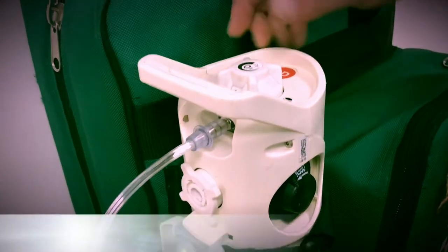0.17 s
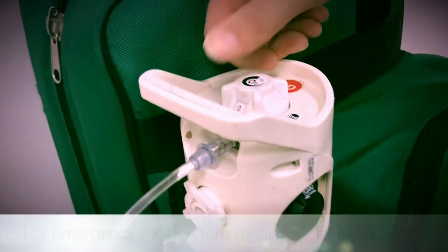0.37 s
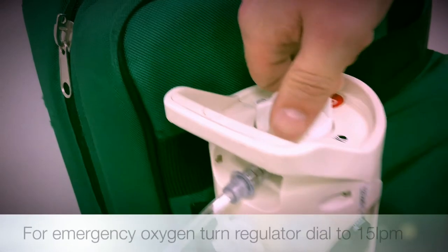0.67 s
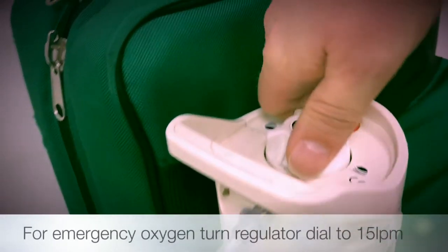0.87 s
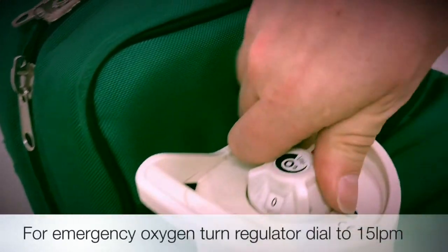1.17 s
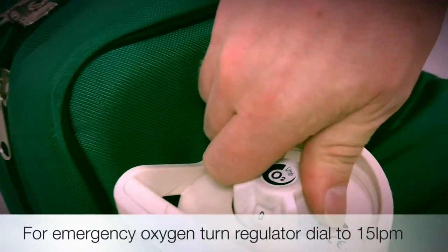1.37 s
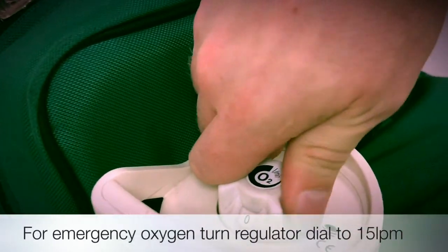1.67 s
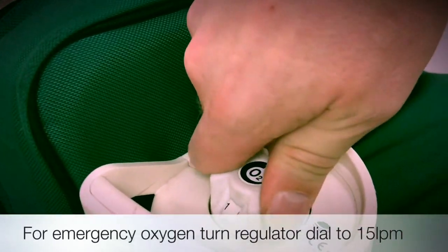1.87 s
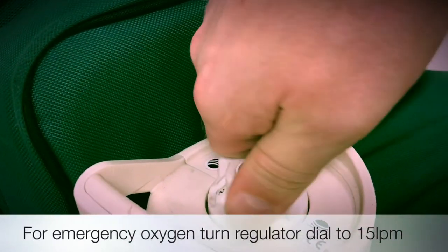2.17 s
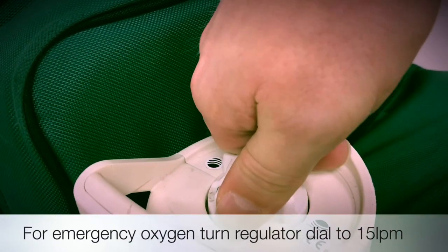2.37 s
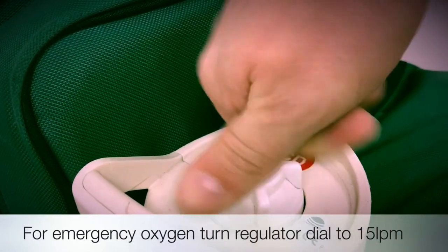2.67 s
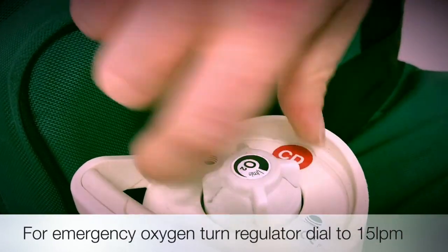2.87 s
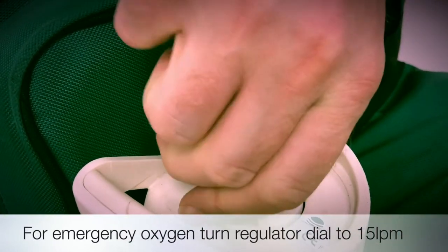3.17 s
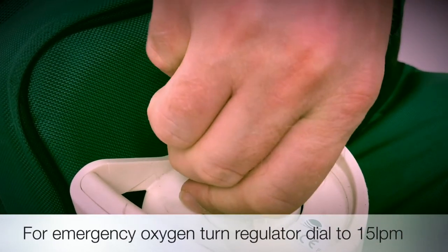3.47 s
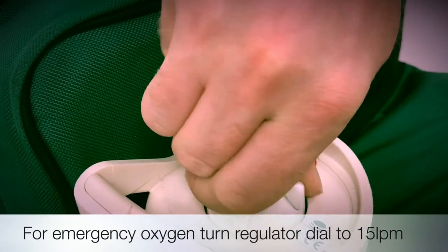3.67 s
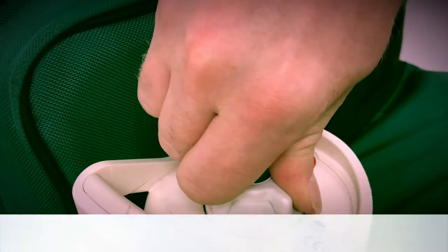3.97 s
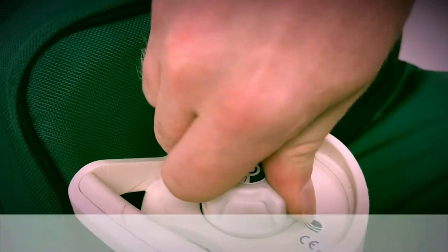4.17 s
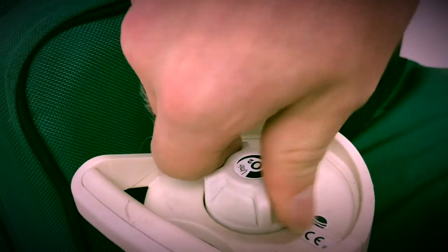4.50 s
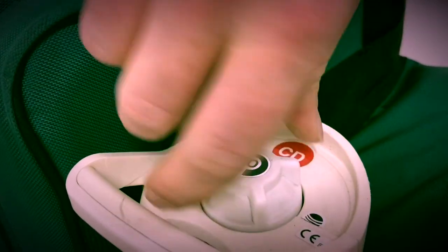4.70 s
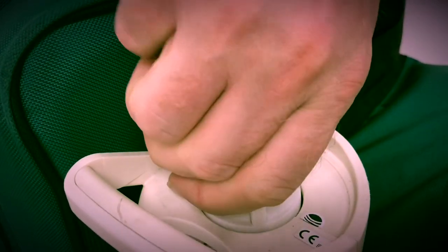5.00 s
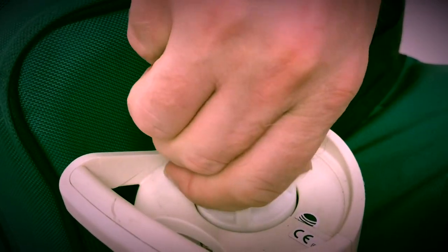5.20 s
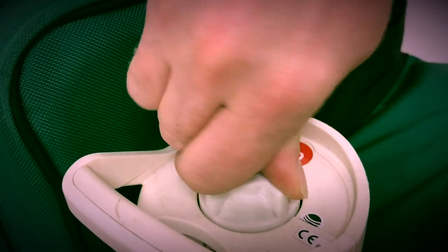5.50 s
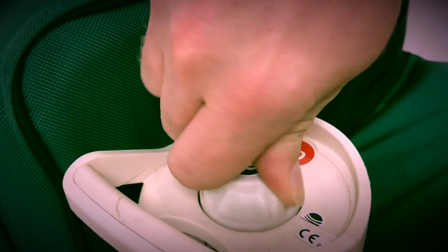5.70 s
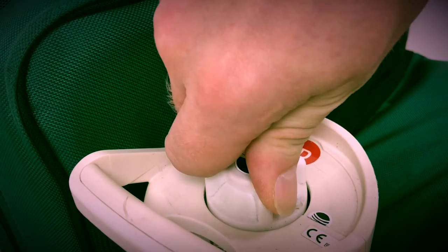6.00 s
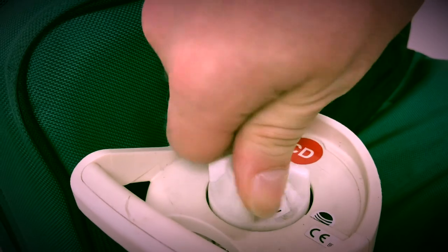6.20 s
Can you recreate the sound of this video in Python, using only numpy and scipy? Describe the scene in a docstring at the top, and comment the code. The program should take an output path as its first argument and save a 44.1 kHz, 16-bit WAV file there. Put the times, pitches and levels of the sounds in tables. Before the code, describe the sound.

A hand turns a plastic gas cylinder dial in a small humming room, ten sharp ratcheting clicks, with faint gas hiss growing stronger toward the end.

```python
"""A small room hums with ventilation and mains; a faint, steady microphone hiss and a thin whistle lie over it.
Fingers rub and tap the plastic flow dial of an oxygen cylinder, close to the microphone, taking a new grip.
Then a hand turns the dial: at each detent a spring catch snaps into its seat and rings the valve head,
and the gas hiss steps to a new strength. Later the hand hovers over the outlet, shading and combing the hiss.
Noise is coloured for air, hiss and plastic contacts; decaying sines ring the metal and the dial."""
import sys
import numpy as np
from scipy import signal
from scipy.fft import rfft, irfft, next_fast_len
from scipy.io import wavfile
from scipy.ndimage import uniform_filter1d

SR = 44100
rng = np.random.default_rng(int(sys.argv[2]) if len(sys.argv) > 2 else 0)


def waveform_to_disk(signal):
    """Save audio, clipped to [-1, 1], as 16-bit WAV at the path in sys.argv[1]."""
    frames = np.transpose(np.atleast_2d(signal))
    scaled = np.clip(frames, -1, 1) * 32767
    samples = np.round(scaled).astype(np.int16)
    wavfile.write(sys.argv[1], SR, samples)


N = 279946
TIME = np.arange(N) / SR
LONG = next_fast_len(N, real=True)
HIT_SIZE = 8192  # samples in one short sound
AGE = np.arange(HIT_SIZE) / SR


def undb(db):
    """Decibels to gain."""
    return 10 ** (np.asarray(db) / 20)


def unit(x):
    """Scale to rms 1."""
    return x / np.sqrt(np.mean(x ** 2))


def bins(size):
    """Frequencies of a spectrum in Hz, kept above zero."""
    return np.maximum(np.fft.rfftfreq(size, 1 / SR), 1)


def shape(points, f):
    """A (Hz, dB) spectrum joined by straight lines on a log frequency axis."""
    hz, db = np.transpose(points)
    return np.interp(np.log(f), np.log(hz), db)


def peaks(resonances, f):
    """Gain in dB of a set of resonances; negative ones are hollows."""
    return sum(db / (1 + (2 * (f - hz) / width) ** 2) for hz, width, db in resonances)


def hump(f, hz, octaves):
    """Gain in dB of a broad band around hz."""
    return -10 * np.log10(1 + (np.log2(f / hz) / octaves) ** 4)


def colour(x, db):
    """Causal (minimum-phase) filter with the given gain per bin; white noise keeps its power."""
    cepstrum = irfft(np.log(unit(undb(db))), len(x))
    # fold the cepstrum forward in time
    cepstrum[1:len(x) // 2] *= 2
    cepstrum[len(x) // 2 + 1:] = 0
    response = np.exp(rfft(cepstrum))
    return irfft(rfft(x) * response, len(x))


def noise(db):
    """Steady coloured noise of rms 1."""
    spectrum = rng.standard_normal(len(db)) + 1j * rng.standard_normal(len(db))
    return unit(irfft(spectrum * undb(db), LONG)[:N])


def walk(rate):
    """Random levels, rate of them a second, joined by straight lines."""
    levels = rng.standard_normal(size=256)
    return np.interp(TIME * rate, np.arange(len(levels)), levels)


def during(start, end, ramp):
    """1 between two times and 0 outside, with straight ramps."""
    return np.clip(np.minimum(TIME - start, end - TIME) / ramp + .5, 0, 1)


def fade(t60, delay=0):
    """Exponential decay that starts after a delay."""
    return (AGE >= delay) * np.exp(-np.log(1000) * np.maximum(AGE - delay, 0) / t60)


def add(out, s, sound):
    """Mix a sound in at time s."""
    start = max(int(s * SR), 0)
    part = out[start:start + len(sound)]
    part += sound[:len(part)]


# Air of the small room: f/Hz, relative level/dB
AIR = [(25, -44), (50, -15), (75, -4.5), (115, -5), (150, -13.5), (280, -17.5), (400, -27), (600, -27.5),
       (900, -32.5), (1400, -32.5), (1800, -36.5), (2450, -37), (4000, -44.5), (15000, -69)]
# Bass resonances of the room, driven by the ventilation: f/Hz, width/Hz, gain/dB
BOOM = [(42, 7.2, 10), (59.4, 3.55, 15), (85.7, 12.7, 8), (218, 6.3, 6.5), (308.2, 14.7, 7)]
# Mains hum and machine tones: f/Hz, rms level/dB before their slow wander
TONES = [(100, -50), (1184, -78), (1297, -78), (1357, -78)]


def hum():
    """Ventilation booms in the room's bass resonances, with mains hum and a few faint machine tones."""
    f = bins(LONG)
    air = undb(-42.0) * noise(shape(AIR, f) + peaks(BOOM, f))
    tones = 0
    for hz, db in TONES:
        level = undb(db + 2.4 * walk(rate=2.98))
        phase = 2 * np.pi * hz * TIME + 0.34 * walk(rate=4.12)
        tones = tones + level * np.sqrt(2) * np.sin(phase)
    return air + tones


# Before the first detent only faint microphone hiss, slowly sagging
IDLE_DB, IDLE_SAG_DB_PER_S = -67, 1.5
# Every new setting overshoots, then settles
SURGE_DB, SURGE_S, STEP_S = 2.2, 0.052, 0.018
# The hiss drops away for a while
LULL_START_S, LULL_END_S, LULL_DB = 3.003, 3.7, -71.5


def hiss_level():
    """Hiss level in dB: each detent steps it to a new setting with a brief surge; once it drops into a lull."""
    db = IDLE_DB - IDLE_SAG_DB_PER_S * TIME
    for s, *_, setting_db in DETENTS:
        surge_db = SURGE_DB * np.exp(-np.maximum(TIME - s, 0) / SURGE_S)
        db = np.where(TIME < s, db, setting_db + surge_db)
    db = uniform_filter1d(db, int(STEP_S * SR) + 1)
    return db + (LULL_DB - db) * during(LULL_START_S, LULL_END_S, STEP_S)


# The hand hovers over the outlet: it shades the jet, reflects the hiss and strengthens the rush
HOVER_START_S, HOVER_END_S, HOVER_MOVE_S = 4.78, 5.26, 0.26
HOVER_SHADE_DB, HOVER_RUSH_DB, HOVER_ECHO_DB = -4, 5, -10
# Narrow whistling bands: f/Hz, width/Hz, flutter/dB
WHISTLES = [(2498, 25, 2), (2770, 50, 2.8), (7000, 450, 1.5), (12660, 190, 1.6)]
# When each of these whistles sings and flares once, row for row:
# start t/s, end t/s, level/dB at middle flow, flare t/s, flare length/s, flare/dB
SINGING = [(.25, 3.14, -74.5, 1.68, .6, 6), (2.66, 5.65, -71, 5, .35, 9), (2.7, 6.6, -72.5, 4.11, 0.22, 11),
           (2.5, 6.6, -75, 6.3, .7, 9)]
MIDDLE_FLOW_DB = -60.5
WHISTLE_GROWTH, WHISTLE_FADE_S = 0.34, .2  # growth in dB per dB of hiss


def whistles(drive_db):
    """Narrow noise bands flutter, swell once and rise slowly with the hiss."""
    f, out = bins(LONG), 0
    for (hz, width, flutter_db), singing in zip(WHISTLES, SINGING):
        start, end, db, flare_s, flare_length, flare_db = singing
        band = noise(-10 * np.log10(1 + (2 * (f - hz) / width) ** 4))
        flare = flare_db * np.exp(-(2 * (TIME - flare_s) / flare_length) ** 2)
        level_db = db + WHISTLE_GROWTH * drive_db + flare + flutter_db * walk(rate=23)
        out = out + band * during(start, end, WHISTLE_FADE_S) * undb(level_db)
    return out


# Hiss of the valve jet, lent to the microphone hiss before it: f/Hz, relative level/dB
JET = [(1500, -17), (2600, -6), (4200, 4.5), (5000, 1.5), (6000, 6.5), (7700, 2.5), (9400, 3.5),
       (10450, -1.5), (11600, 3.5), (15500, 1)]
# Resonances of the gas passage: f/Hz, width/Hz, gain/dB
PASSAGE = [(2550, 500, 2), (3800, 250, 3.5), (4490, 250, 2), (5980, 190, 4), (9780, 300, 2),
           (12700, 800, 2)]
# Lower rush of the outlet: f/Hz, relative level/dB
RUSH = [(300, -3), (700, -2), (1100, 3.5), (2000, 2.5), (3600, 1), (5000, -5), (9000, -8.5), (15000, -42)]
# Rush relative to the hiss at middle flow, and its further gain per dB of hiss
RUSH_DB, RUSH_GROWTH = -2, 0.65


def hiss_and_whistles():
    """Microphone hiss, then from the first detent a gas jet whose lower outlet rush outgrows its hiss."""
    hiss_db, hover = hiss_level(), during(HOVER_START_S, HOVER_END_S, HOVER_MOVE_S)
    drive_db = hiss_db - MIDDLE_FLOW_DB
    rush_db = RUSH_DB + RUSH_GROWTH * drive_db + HOVER_RUSH_DB * hover
    f = bins(LONG)
    passage = peaks(PASSAGE, f)
    jet = noise(shape(JET, f) + passage) * undb(0.13 * walk(rate=14))
    rush = noise(shape(RUSH, f) + passage) * undb(rush_db + 1.5 * walk(rate=7.2))
    hiss = undb(hiss_db) * (jet + rush)
    # the path by way of the hand is a millisecond longer, which combs the hiss
    echo = undb(HOVER_ECHO_DB) * hover
    reflected = np.interp(TIME - .001, TIME, hiss)
    hiss = (hiss + echo * reflected) / np.sqrt(1 + echo ** 2)
    return (hiss + whistles(drive_db)) * undb(HOVER_SHADE_DB * hover)


# Colour of the plastic housing: f/Hz, relative level/dB
HOUSING = [(300, -13.5), (750, -2), (1650, -6.5), (2200, 3.5), (2950, -1), (3450, 3.5), (4000, 0.5),
           (5050, -1), (5750, -1), (8500, -0.5), (10300, -3), (12900, -5), (15200, -3), (16300, -1.5)]
# Resonances and hollows of the plastic shell round the valve: f/Hz, width/Hz, gain/dB
SHELL = [(2330, 110, 2.5), (2640, 77, 2.5), (3070, 170, -1), (3450, 170, 4), (5140, 310, -6),
         (5670, 290, 3), (10400, 460, -3.5)]


def plastic(f):
    """Gain in dB of housing and shell, which colour every contact."""
    return shape(HOUSING, f) + peaks(SHELL, f)


# Fingers sliding on the plastic, close to the microphone:
# t/s at the middle, length/s, level/dB, centre f/Hz, width/octaves
RUBS = [(0.112, 0.044, -64, 4170, .06), (.6, .17, -60.5, 3800, 1.8), (.815, .05, -56, 4400, .4),
        (0.923, .13, -59.5, 8000, 1.3), (1.162, 0.047, -51.5, 7000, 2), (1.317, .054, -56, 6960, 1.3),
        (1.6, .075, -59.5, 8000, 1.9), (2.701, 0.053, -52, 9600, .55), (3.155, .035, -58, 2700, 1.5),
        (4.555, .031, -55, 2200, .7)]


def rubs():
    """Skin sticks and slips on the plastic: a swell of tiny clicks of very uneven size."""
    out, f = np.zeros(N), bins(HIT_SIZE)
    middle = AGE.mean()
    for s, length, db, hz, octaves in RUBS:
        grit_db = 6 * np.minimum(rng.exponential(size=HIT_SIZE), 6)
        slips = unit(rng.standard_normal(HIT_SIZE) * undb(grit_db))
        swell = np.exp(-(2 * (AGE - middle) / length) ** 2)
        tone = plastic(f) + hump(f, hz, octaves)
        add(out, s - middle, undb(db) * colour(slips * swell, tone))
    return out


def burst(envelope):
    """Noise under an envelope, evened out so that it drives all resonances alike."""
    x = envelope * rng.standard_normal(HIT_SIZE)
    power = uniform_filter1d(np.abs(rfft(x)) ** 2, size=110)
    x = colour(x, -10 * np.log10(power))
    return unit(x) * np.sqrt(np.mean(envelope ** 2))


def room_tail(db):
    """Dense reflections from nearby surfaces, 5 ms late."""
    return undb(db) * fade(t60=.12, delay=.005) * rng.standard_normal(HIT_SIZE)


def contact(hz, octaves, t60):
    """One light contact, coloured by housing and shell; the softer the contact, the lower its band."""
    f = bins(HIT_SIZE)
    touch = burst(fade(t60)) + room_tail(db=-31)
    return colour(touch, plastic(f) + hump(f, hz, octaves))


# The first grip scatters faint ticks over this stretch, each raised by a random part of the spread
GRIP_START_S, GRIP_END_S, GRIP_HZ = .72, 1.08, 10000
GRIP_LOWEST_DB, GRIP_SPREAD_DB = -54, 6


def grip_ticks():
    """The first grip makes ten faint, bright contacts at random moments."""
    out = np.zeros(N)
    for place, strength in rng.random(size=(10, 2)):
        s = GRIP_START_S + place * (GRIP_END_S - GRIP_START_S)
        level = undb(GRIP_LOWEST_DB + GRIP_SPREAD_DB * strength)
        add(out, s, level * contact(GRIP_HZ, octaves=1.0, t60=0.0072))
    return out


# Finger taps on the dial, and a low knock just after a detent (last row):
# t/s, level/dB, centre f/Hz, width/octaves, t60/s
TAPS_AND_KNOCK = [(.7815, -49, 3800, .5, .016), (1.155, -45.5, 3500, 1.7, 0.04),
                  (1.708, -44.5, 4200, 1.4, .022), (3.1907, -23.5, 4700, 1.3, .011),
                  (3.2777, -31, 2900, 1.6, .024), (3.283, -45.5, 600, .25, 0.075),
                  (4.3259, -38, 850, .55, .07)]
# Ringing modes of the dial: f/Hz, relative level/dB, t60/s
DIAL_MODES = [(578, -12, 0.084), (1560, -8.5, 0.043), (2376, 2.5, 0.044), (2710, -7, 0.058)]
DIAL_RING_DB = -12.5  # ring relative to the contact


def taps_and_knock():
    """Each tap or knock is a contact that rings the modes of the dial."""
    out = np.zeros(N)
    ring = sum(undb(db) * fade(t60) * np.sin(2 * np.pi * hz * AGE) for hz, db, t60 in DIAL_MODES)
    for s, db, hz, octaves, t60 in TAPS_AND_KNOCK:
        add(out, s, undb(db) * (contact(hz, octaves, t60) + undb(DIAL_RING_DB) * ring))
    return out


# The catch slips over the crest just before some detents: t/s, level/dB
CREST_TICKS = [(1.9732, -18), (2.2452, -19), (2.5968, -15.5)]


def crest_ticks():
    """The catch ticks brightly as it slips over its crest."""
    out = np.zeros(N)
    for s, db in CREST_TICKS:
        add(out, s, undb(db) * contact(hz=11200, octaves=0.87, t60=0.017))
    return out


# Ringing modes of the valve head: f/Hz, relative level/dB, t60/s
VALVE_MODES = [(2283, -5, .04), (2660, -11, .04), (3013, -12, .055), (3462, -1, .062), (3594, -3, .055),
               (3796, -10, .075), (4404, -15, .045), (5561, -7, .058), (5798, -6, .04), (6600, -11, .04),
               (8081, -9, .035), (8527, -17, .055), (9184, -16, .065), (10916, -12, .04),
               (13636, -10, .035), (15140, -8, .035)]


def valve_ring():
    """Each seat strikes the metal modes in slightly different shares, tunings and phases."""
    chance = rng.standard_normal((len(VALVE_MODES), 3))
    ring = 0
    for (hz, db, t60), (share, detune, turn) in zip(VALVE_MODES, chance):
        phase = 2 * np.pi * hz * (1 + .001 * detune) * AGE + np.pi * turn
        ring = ring + undb(db + 2 * share) * fade(t60) * np.sin(phase)
    return ring * (1 - fade(t60=0.0021))


# Detents of the dial; hiss_level() takes the last column too: t/s, level/dB, brightness/(dB per octave),
# metal ring/dB before a common 7.5 dB cut, low knock/dB, hollow under the hand f/Hz, its lift/dB,
# hiss level/dB at this setting
DETENTS = [(1.9771, -15.5, 2.5, -8, -35, 8900, 10, -61.5), (2.2492, -14, 2.5, -9, -28.5, 9100, 10.5, -62),
           (2.5990, -15, 6, -20, -28.5, 8840, 13, -62.5), (3.6994, -14, 5, -8.5, -24.5, 2330, 9.5, -60.5),
           (4.0037, -14, 4.5, -8, -43, 6300, 10.5, -59.5), (4.3079, -14.5, 4.5, -6, -40, 3280, 7.5, -59),
           (5.2757, -13, 3, -3.5, -31, 7040, 8.5, -57), (5.5187, -15, 3, -4.5, -34, 6260, 15, -56),
           (5.8022, -11, 4.6, -11.5, -28, 6080, 14, -54.5), (6.2334, -12, 4.5, -11, -30.5, 8300, 7, -52.5)]


def detents():
    """The catch hits the flank of its notch, slams into the seat a moment later, and housing and valve ring on."""
    out, f = np.zeros(N), bins(HIT_SIZE)
    octave = np.log2(np.maximum(f, 500) / 5000)
    seat_s = .0013
    for s, db, bright_db, ring_db, knock_db, hollow_hz, hollow_db, _ in DETENTS:
        flank = undb(4.5) * fade(t60=0.011) * (1 - fade(t60=0.0033))
        seat = undb(2.0) * fade(t60=0.0074, delay=seat_s)
        housing = undb(-12.0) * fade(t60=0.029, delay=seat_s)
        envelope = np.sqrt(flank ** 2 + seat ** 2 + housing ** 2)
        tone = plastic(f) + bright_db * octave
        snap = colour(burst(envelope), tone + peaks([(hollow_hz, 900, hollow_db)], f))
        room = colour(room_tail(db=-24.0), tone + hump(f, hz=2620, octaves=1.3))
        # the whole carrying handle gives a dull, slower knock
        thud = burst(fade(t60=0.078, delay=seat_s))
        knock = undb(knock_db) * colour(thud, hump(f, hz=960, octaves=0.63))
        ring = undb(ring_db - 7.5) * valve_ring()
        add(out, s, undb(db) * (snap + room + knock + ring))
    return out


def scene():
    """Room, hiss, fingers and dial on one channel."""
    fingers = rubs() + grip_ticks() + taps_and_knock()
    return (hum() + hiss_and_whistles() + fingers + crest_ticks() + detents())[None]


# Brief dips of the whole level: t/s, half width/s, depth (0-1)
DIPS = [(.062, .03, .95), (.025, .04, .4), (4.431, .028, .88)]
TOP_HZ = 15750


def record(dry):
    """The level dips briefly, and a steep low-pass cuts the top."""
    gain = np.ones(N)
    for s, width, depth in DIPS:
        gain *= 1 - depth * np.maximum(1 - np.abs(TIME - s) / width, 0)
    low_pass = signal.ellip(8, .2, 70, TOP_HZ, fs=SR, output="sos")
    return signal.sosfilt(low_pass, dry * gain)


dry = scene()
out = record(dry)
waveform_to_disk(out)
```